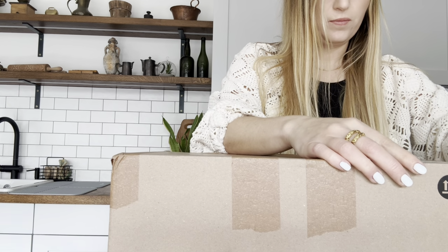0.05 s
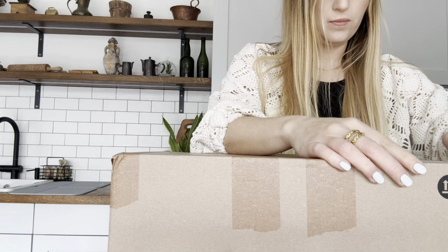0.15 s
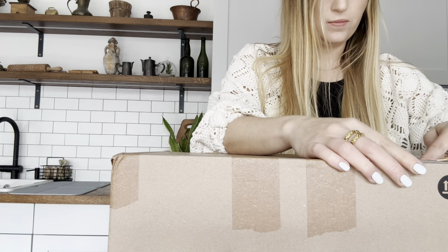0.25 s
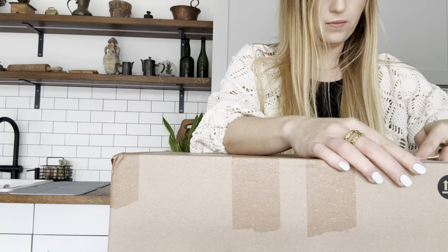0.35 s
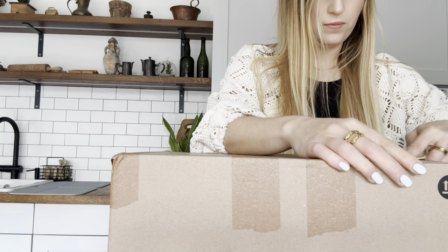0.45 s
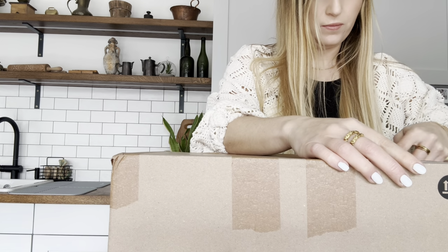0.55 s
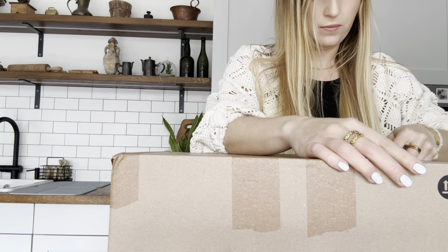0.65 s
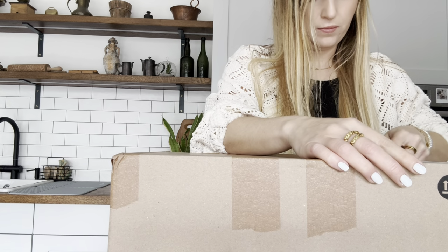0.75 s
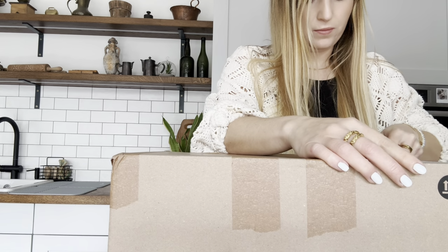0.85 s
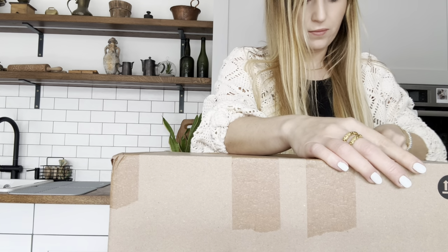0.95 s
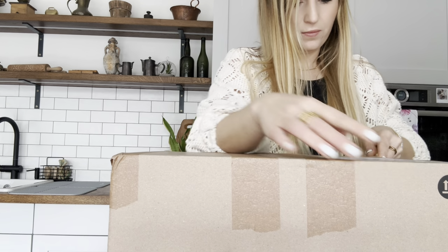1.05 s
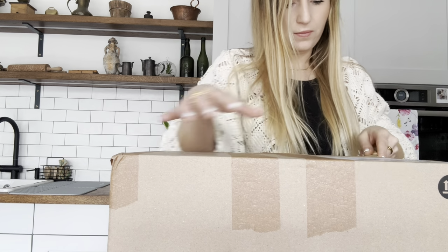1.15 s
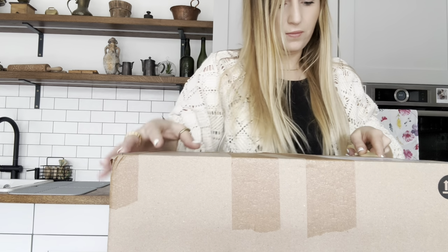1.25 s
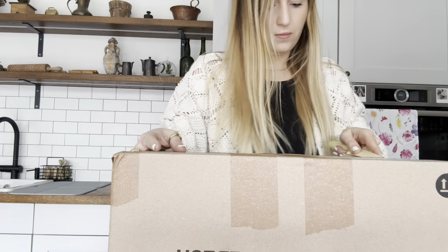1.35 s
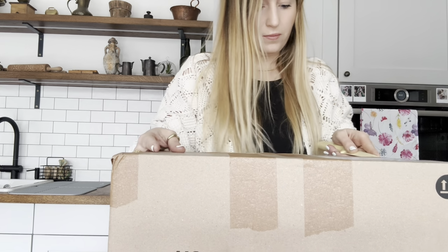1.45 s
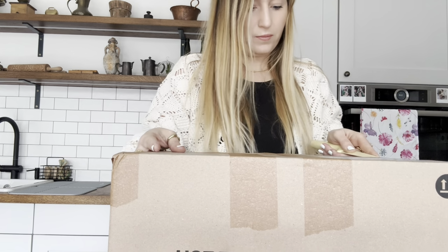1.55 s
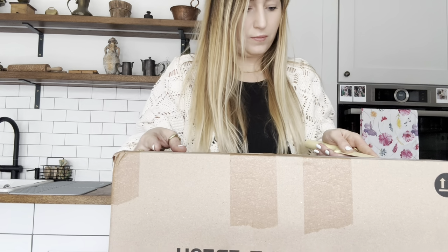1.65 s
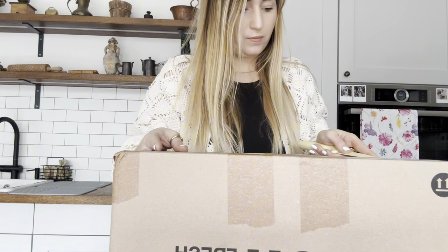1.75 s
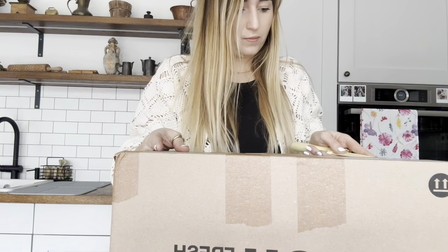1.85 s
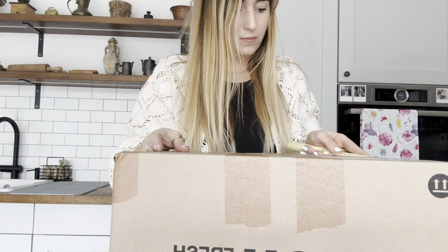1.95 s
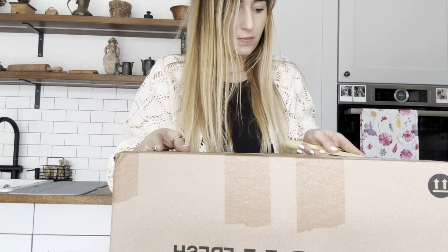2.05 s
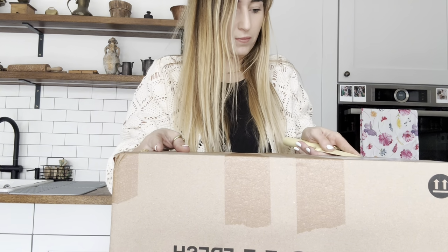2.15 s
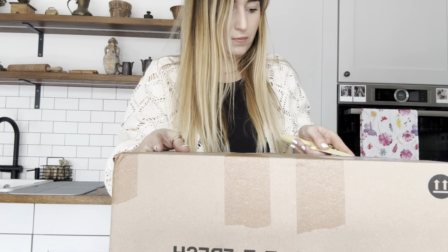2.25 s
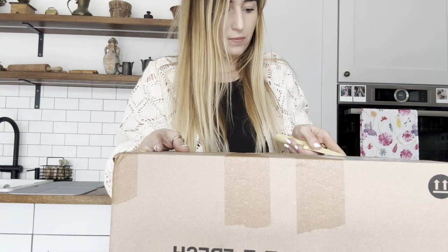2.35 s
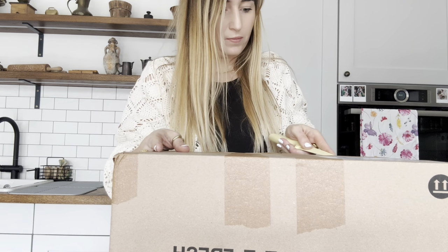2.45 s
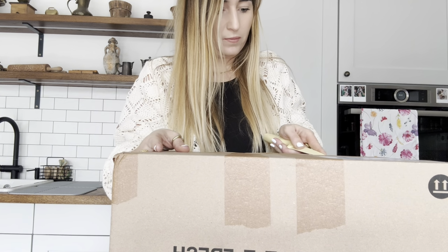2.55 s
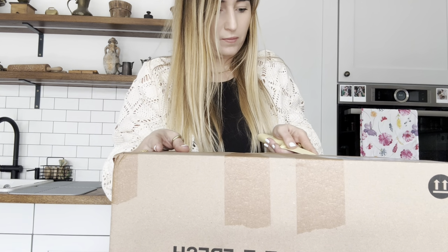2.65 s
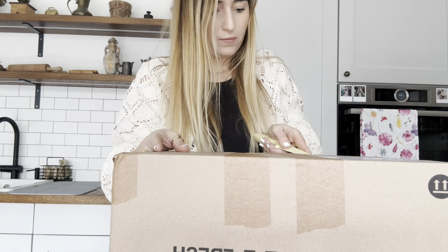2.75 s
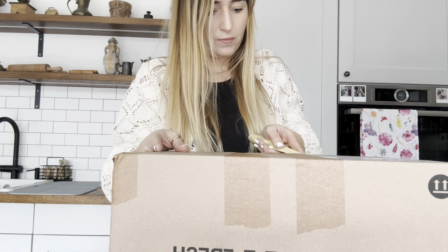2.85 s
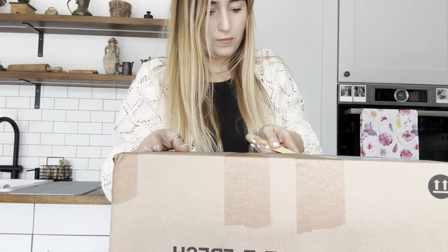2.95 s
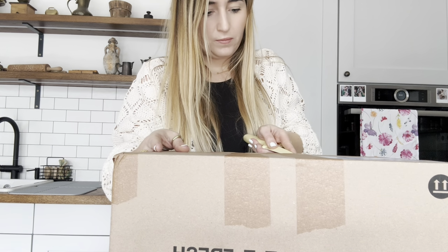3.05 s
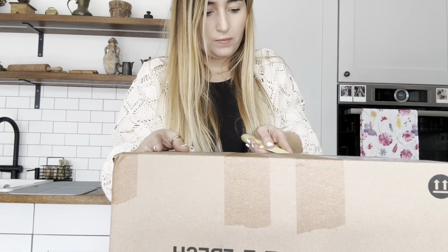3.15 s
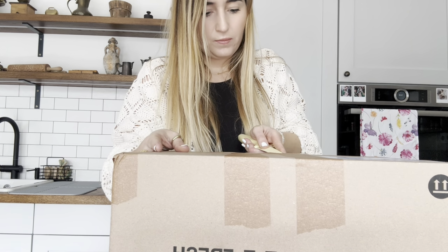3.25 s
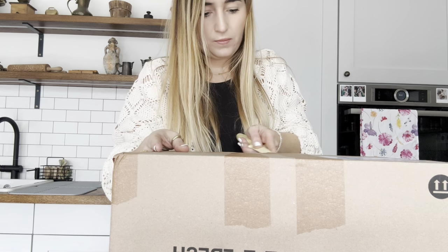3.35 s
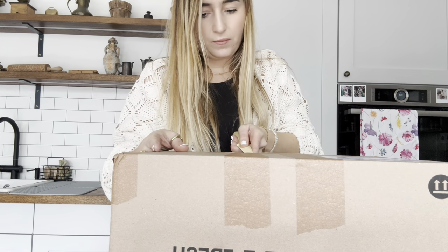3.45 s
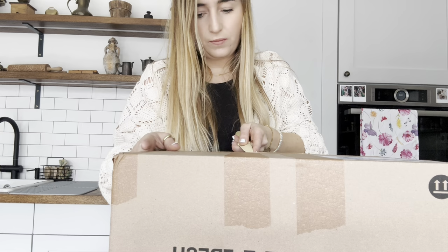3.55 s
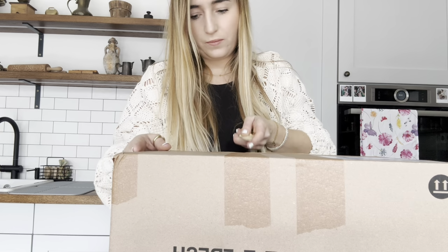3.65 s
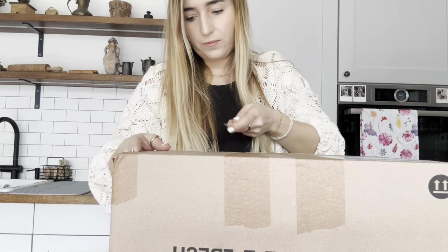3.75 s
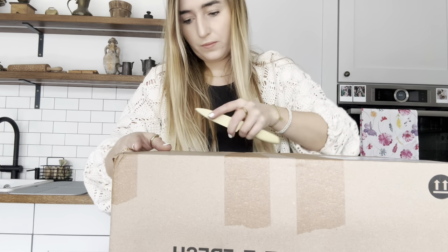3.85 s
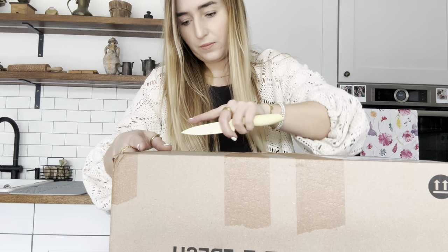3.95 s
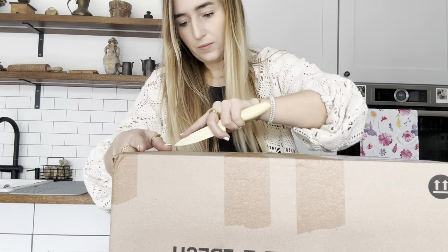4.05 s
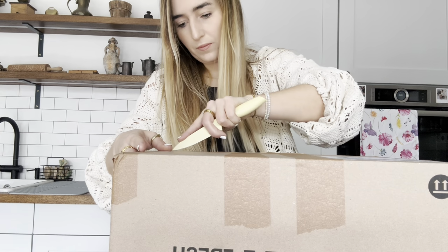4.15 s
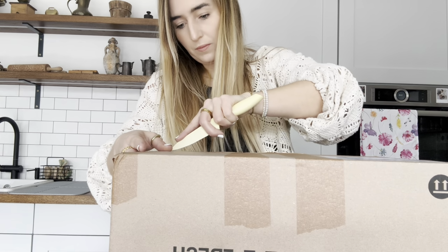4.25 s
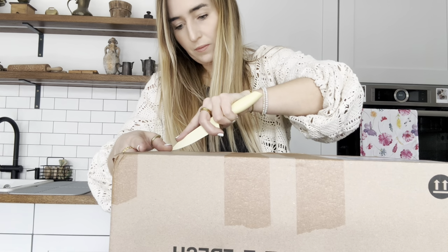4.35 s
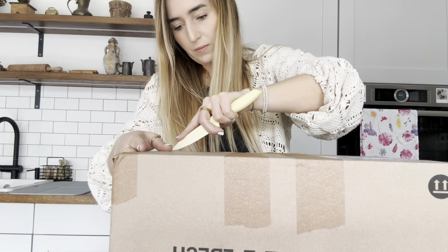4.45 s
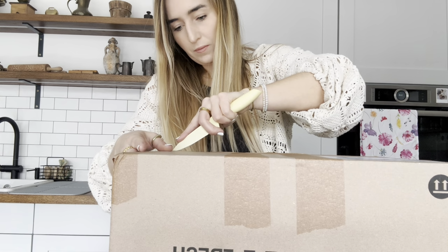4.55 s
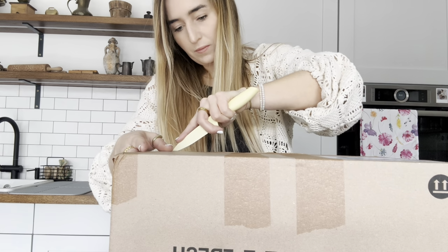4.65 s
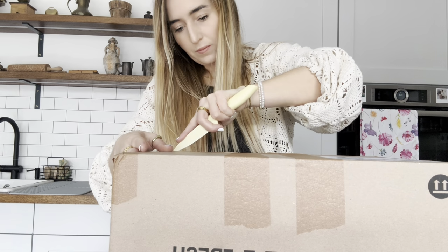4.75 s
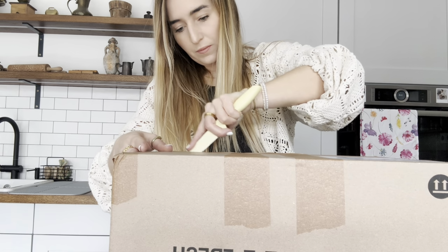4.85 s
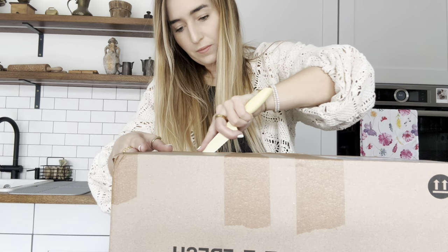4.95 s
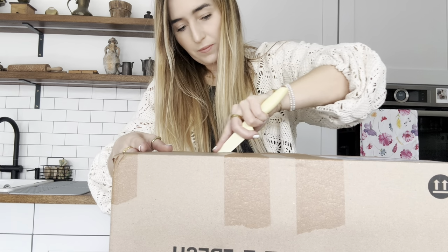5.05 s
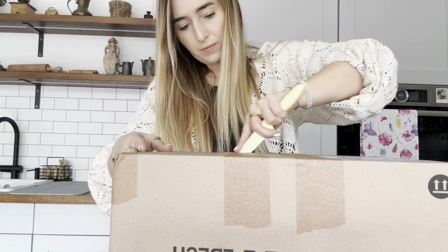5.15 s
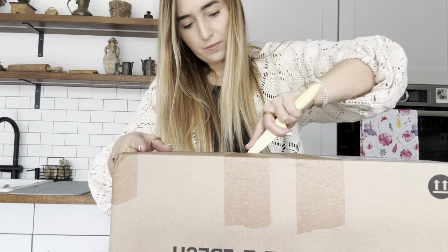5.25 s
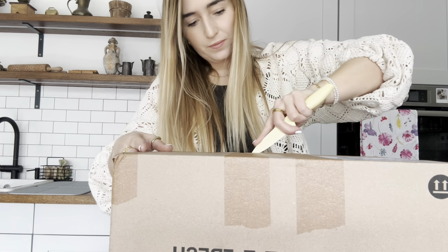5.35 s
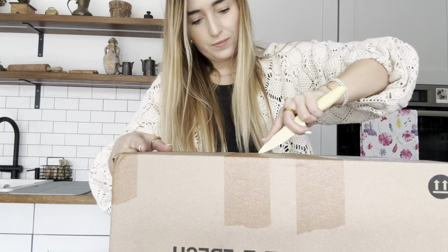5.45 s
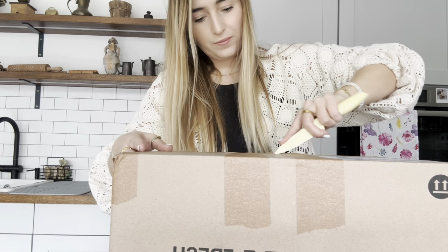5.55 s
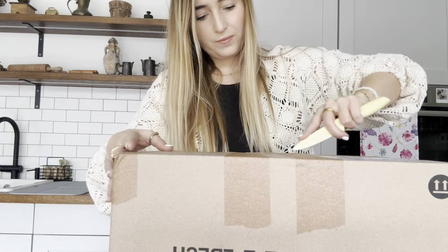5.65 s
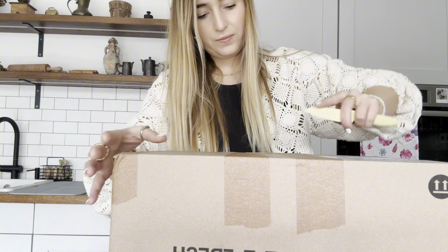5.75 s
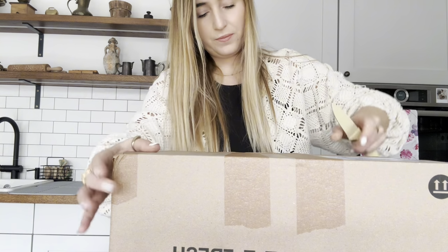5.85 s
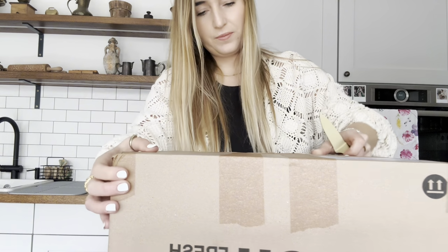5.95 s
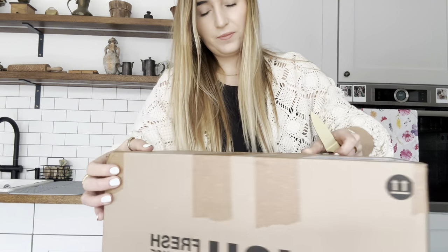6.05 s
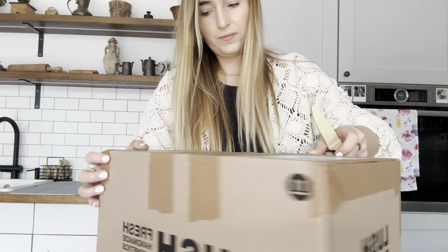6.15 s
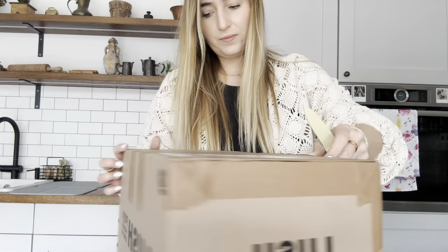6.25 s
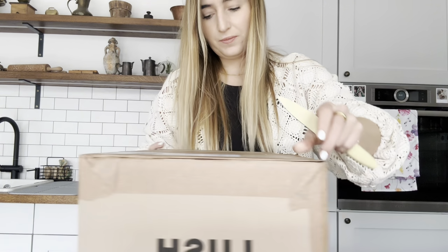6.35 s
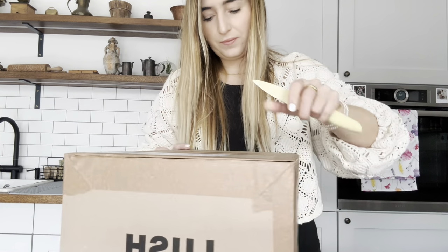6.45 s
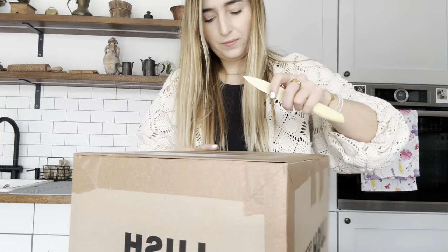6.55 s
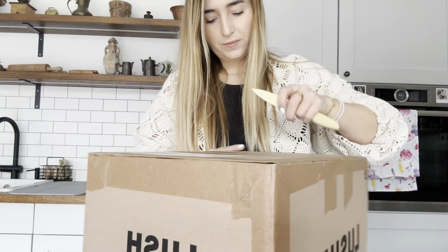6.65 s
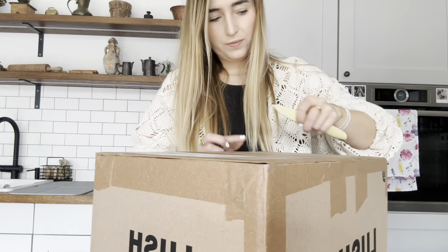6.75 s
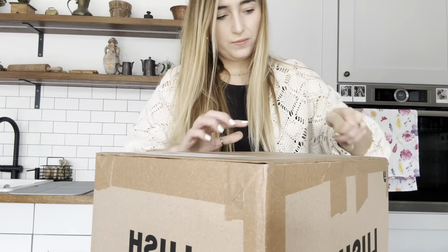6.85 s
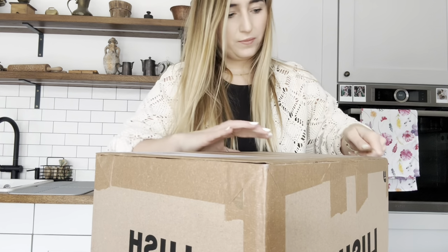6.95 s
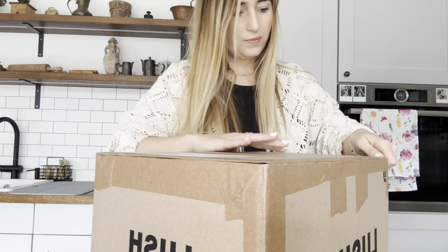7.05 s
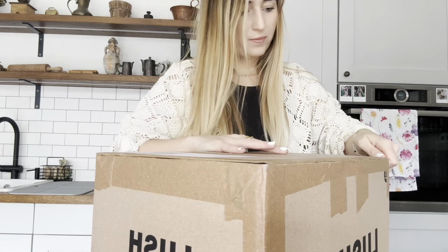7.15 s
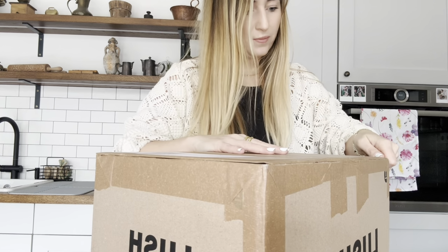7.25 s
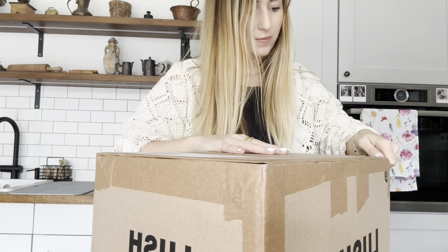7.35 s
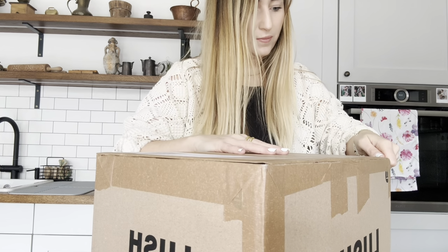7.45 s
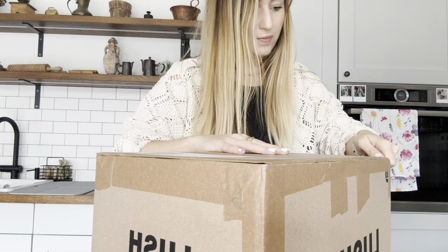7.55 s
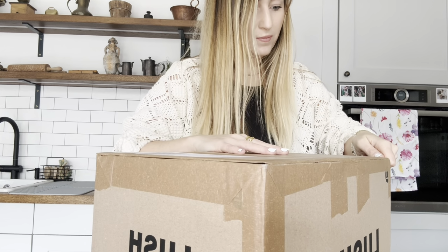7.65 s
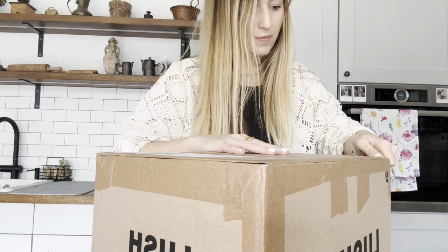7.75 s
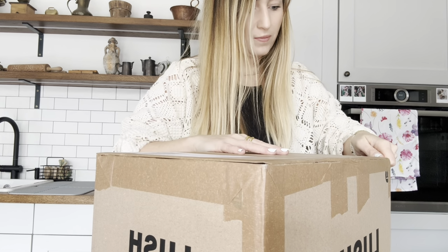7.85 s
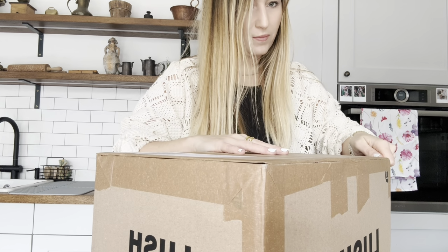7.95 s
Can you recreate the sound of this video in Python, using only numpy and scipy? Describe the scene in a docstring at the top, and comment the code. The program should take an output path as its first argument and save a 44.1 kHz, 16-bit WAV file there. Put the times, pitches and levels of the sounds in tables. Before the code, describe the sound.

Close to a stereo microphone in a quiet kitchen, a blade scrapes and rips tape on a large cardboard box, then hands brush softly over it. Lighter and deeper cuts follow, stuttering and raspy, ending with a tape tear and a knife clack. After a quieter shuffle, another rough cut comes, then knocks, a gritty drag as the box turns, a softer slide and faint pats.

```python
"""Opening a taped box

A knife slits the packing tape of a big cardboard box in a kitchen, close to a stereo microphone.
Blade and hands stick and slip on the board: random tiny slips pass through the box's colours.
The tape snaps in bursts of noise, and the hollow box booms with low swelling tones when pushed.
Then the box is gripped, dragged round on the table and patted, over still air and a faint hum.
"""
import sys
import numpy as np
from scipy import signal
from scipy.fft import rfft, irfft
from scipy.io import wavfile
from scipy.ndimage import uniform_filter1d

SR = 44100
rng = np.random.default_rng(int(sys.argv[2]) if len(sys.argv) > 2 else 0)


def unload_audio(sound):
    """Save the sound as a 16-bit wav file, at the path given as the first command line argument."""
    columns = np.transpose(np.atleast_2d(sound))
    # keep every value between -1 and 1, then stretch to whole-number steps
    steps = np.round(np.clip(columns, -1, 1) * 32767)
    wavfile.write(sys.argv[1], SR, steps.astype(np.int16))


N = 352535  # length in samples

# All levels in the tables are relative: the mixing below scales them further.
# Strokes of blade and hand, one table for each way of rubbing. Each row: start in seconds,
# rise in seconds, hold in seconds, friction level in dB, treble bite in dB,
# change of level over the hold in dB.
SIDE_CUT = [(0.0, 0.0011, 0.022, -27.5, -1.5, -1), (0.04, 0.023, 0.049, -41, -13, 1),
            (0.127, 0.029, 0.023, -29, -1, 1.5), (0.19, 0.065, 0.18, -32, -4.5, 2.5),
            (0.36, 0.13, 0.16, -29, -3.5, -3.5)]
HAND_BRUSH = [(0.8, 0.02, 0.14, -47, -11.5, -2.5), (0.948, 0.027, 0.038, -45, -0.5, -3),
              (1.0, 0.018, 0.086, -41, -25, -0.5), (1.045, 0.016, 0.015, -49, 4.5, -4),
              (1.223, .002, 0.057, -59, 1.5, 18), (1.257, 0.041, 0.053, -36.5, -11, -5),
              (1.34, 0.026, 0.089, -41, -9, -8.5), (1.46, 0.067, 0.13, -62.5, -15, 16.5)]
LIGHT_CUT = [(1.612, 0.037, 0.053, -56.5, -3, 10), (1.715, 0.053, 0.11, -39, -4.5, -3.5),
             (1.88, 0.043, 0.099, -49, -3, 1.5), (2.015, 0.016, 0.032, -40.5, -2, 5.5)]
DEEP_CUT = [(2.155, 0.057, 0.55, -36.5, -4, -3), (2.228, 0.0066, 0.097, -34.5, -14, -0.5),
            (2.35, 0.07, 0.082, -29.5, -12, -2.5), (2.505, 0.0087, 0.02, -30.5, -6, -6.5),
            (2.583, 0.0091, 0.023, -32.5, -14.5, 0.5), (2.655, 0.018, 0.021, -38, -14, 3),
            (2.715, 0.0079, 0.08, -33.5, -6.5, 0.5)]
SHORT_CUTS = [(2.887, 0.023, 0.021, -35.5, -6, 2.5), (2.938, 0.0052, 0.011, -35.5, -2, 1),
              (3.045, 0.026, 0.09, -40, -4, 1.5), (3.16, 0.025, 0.018, -30, -5.5, 0.5),
              (3.21, 0.033, 0.14, -39, -4, -7)]
TAPE_TEAR = [(3.295, 0.036, 0.041, -33.5, -8.5, 4.2), (3.425, 0.021, 0.011, -37, -13, 0.5),
             (3.48, 0.013, 0.19, -52.5, -3, 1)]
FINGER_SHUFFLE = [(4.099, .007, 0.077, -53, -14.5, -1), (4.27, 0.036, 0.032, -62.5, -17, 1),
                  (4.365, 0.031, 0.015, -53.5, -19, 0.5), (4.452, .012, 0.087, -53, -18, -9)]
KNIFE_SET = [(4.55, 0.11, 0.6, -52, -20.5, 2), (5.44, 0.032, 0.034, -38, -27, 0)]
RETURN_CUT = [(4.74, 0.027, 0.011, -49, -3, 14), (4.777, 0.028, 0.045, -26.5, -6.5, 1.5),
              (5.17, 0.017, 0.0053, -27.5, -19, -6.5), (5.21, 0.025, 0.18, -42.5, -1.5, -1.5),
              (5.43, 0.087, 0.02, -41.5, 3.5, -1.5), (5.52, 0.017, 0.039, -42.5, -1, 1),
              (5.66, 0.0025, 0.012, -39.5, -17.5, -13)]
TAPE_SLIT = [(4.94, 0.029, 0.053, -36, 1, 3.4), (5.02, 0.035, 0.097, -29, -3, 1)]
BOX_DRAG = [(5.835, 0.017, 0.055, -40.5, -4, 1.5), (5.91, 0.045, 0.021, -37.5, 1, -2.5),
            (5.95, 0.092, 0.192, -37, 6.5, 3.5), (6.235, 0.03, 0.069, -33.5, 5.5, -3),
            (6.33, 0.015, 0.052, -35.5, 4, -5)]
SLEEVE_SLIDE = [(6.39, 0.051, 0.2, -42, 2, 4), (6.63, 0.029, 0.074, -44.5, 1, -2),
                (6.77, 0.025, 0.037, -49, -18, -4.5)]
PALM_SETTLE = [(6.982, 0.0022, 0.084, -82, 20, 2), (7.045, 0.015, 0.051, -55.5, -9, 9.5),
               (7.13, 0.049, 0.055, -56.5, -11.5, 2), (7.314, 0.019, 0.019, -45, -19, -4),
               (7.7, 0.032, 0.012, -69.5, -14, -2)]
# The ways of rubbing. Each row: its strokes, its colour as pairs of Hz and dB, weight of the treble
# lifts (a plain factor), slips per second, spread of slip sizes in dB, boom in dB,
# release in dB per second, level of the snags in dB, pitch of the snags in Hz.
STROKES = [ (SIDE_CUT, [(40, -13.5), (92, 2.5), (183, -20), (240, -9.5), (423, -12.5), (590, -4.5),
           (744, -15), (2360, -23.5), (2670, -22.5), (3590, -27), (8070, -25), (9820, -28), (12900, -24.5),
           (14200, -43.5)], 0.34, 4000, 2.2, -0.76, 197, -16, 530), (HAND_BRUSH, [(40, -11.5), (86, -10),
           (170, -19), (528, -17.5), (692, -19), (2310, -35), (3170, -32.5), (3680, -35), (9350, -36.5),
           (12000, -33), (14200, -40.5)], 0.47, 5000, 0.92, -0.64, 320, -10, 490), (LIGHT_CUT, [(40, -22),
           (92, 3), (188, -14), (260, -12), (403, -14.5), (528, -6.5), (692, -15), (1280, -15),
           (1720, -13.5), (1950, -18.5), (2360, -30.5), (4160, -30), (5190, -32), (12600, -32),
           (14200, -46)], 0.97, 2700, 2.7, -0.59, 200, -10.5, 504), (DEEP_CUT, [(40, -13), (97, 3),
           (175, -13.5), (315, 1), (403, -9.5), (467, 0.5), (1080, -10.5), (1160, -10), (1720, -14.5),
           (2310, -26), (3100, -29), (10100, -32), (12300, -31), (14200, -44)],
           1, 1300, 1.5, 0, 140, -7.5, 505), (SHORT_CUTS, [(40, -16), (97, -3.5), (348, -14), (444, -3),
           (515, -7.5), (1130, -15), (1720, -12), (2250, -26.5), (3100, -17), (3770, -23), (4370, -20),
           (10300, -21), (12300, -20.5), (14200, -35)], 0.86, 1800, 1.3, -1.02, 280, -11, 560),
           (TAPE_TEAR, [(40, -18.5), (102, -24.5), (162, -25.5), (229, -14), (286, -17.5), (763, -18),
           (1100, -31.5), (1720, -27), (4820, -30), (12600, -32), (14200, -47)],
           0.22, 2500, 0.93, 7.7, 137, -8, 810), (FINGER_SHUFFLE, [(40, -20), (107, -7.5), (175, -31.5),
           (246, -25), (642, -24.5), (1160, -39), (1310, -47), (12300, -38), (14200, -59)],
           .2, 4200, 1.4, -9.5, 690, -17, 484), (KNIFE_SET, [(40, 2.5), (76, -12), (151, -5), (190, -10),
           (515, -3.5), (582, -8), (952, -12), (2950, -35), (14200, -39)], .1, 5900, 2, 3, 200, -15.5, 710),
           (RETURN_CUT, [(40, -14), (86, -1), (185, -18), (290, -6.5), (374, -7), (434, -1), (520, -2),
           (658, -1.5), (1020, -11.5), (1720, -15), (2420, -17), (9580, -22.5), (12000, -19.5),
           (14200, -28)], 0.41, 1600, 0.54, 0, 130, -13.5, 440), (TAPE_SLIT, [(40, -27), (95, -6),
           (175, -12.5), (280, -5), (450, -1.5), (660, -0.5), (1010, -10.5), (1200, -7), (2200, -11),
           (2700, -14.5), (6800, -20), (10000, -20.5), (12000, -15.5), (14200, -28.5)],
           0.3, 1200, 2.4, 0, 180, -11.5, 600), (BOX_DRAG, [(40, -11), (80, -5), (188, -7.5), (315, -2.5),
           (413, -3.5), (612, -4), (821, -3), (1800, -6.5), (2140, -13), (3770, -22), (9820, -22.5),
           (12300, -17), (14200, -29.5)], .2, 8000, 1.7, -1, 410, -13.5, 490), (SLEEVE_SLIDE, [(40, -6),
           (92, 8.5), (183, -4), (240, 1), (906, 2.5), (1000, -1.5), (1410, 0.5), (5720, -20.5),
           (10100, -20), (12300, -15.5), (14200, -30.5)], 0.103, 5900, 0.71, -1.2, 270, -16.5, 350),
           (PALM_SETTLE, [(40, -0.5), (97, 0.5), (188, -20), (253, -17.5), (413, -19.5), (1280, -34.5),
           (9820, -41), (12300, -40.5), (14200, -52)], 0.072, 3300, 2.5, -11, 340, -25, 290)]
# Resonances of the box panels that colour the rubbing. Each row: pitch in Hz, width in Hz, lift in dB.
PANELS = [(101, 254, 6), (189, 21, -4.5), (238, 49, 4.5), (323, 51, 4.5), (373, 33, -0.5), (485, 144, 2),
          (520, 77, 1.5), (634, 36, 2), (980, 280, 1)]
# Treble lifts of the rubbing, strongest in the light, deep and short cuts.
# Each row: pitch in Hz, width in Hz, lift in dB before the weight.
TREBLE_LIFTS = [(1703, 250, 5), (2170, 1600, 4), (3127, 530, 7), (4250, 480, 8), (5230, 1100, -1.5),
                (6400, 620, 3), (12150, 640, 3.5)]
# Low and high roll-off applied to the rubbing. Each row: frequency in Hz, gain in dB.
RUB_ROLLOFF = [(24, -26), (40, -2), (12800, -2.5), (13900, 5), (14900, -24.5)]
# The lid is pushed in and the air in the box booms. Each row: time in seconds, level in dB, pitch in Hz.
BOOMS = [(0.019, -17, 88.6), (0.068, -18.5, 96.5), (0.151, -17, 83.5), (0.449, -18, 78), (0.555, -17, 89.2),
         (0.803, -20, 95.2), (1.07, -25, 89.3), (1.287, -19.5, 80), (1.623, -32.5, 93),
         (1.703, -24.5, 93.4), (2.056, -30, 92), (2.411, -23, 100.2), (2.628, -24.5, 94),
         (2.821, -25.5, 94), (2.923, -29.5, 92), (3.348, -16, 96.4), (3.369, -15.5, 104.6),
         (3.478, -30, 99), (3.621, -16.5, 89.6), (4.116, -36, 81), (4.167, -33, 106), (4.313, -35.5, 106),
         (4.408, -33.5, 107.6), (4.467, -36, 86), (4.518, -37.5, 76), (5.197, -22.5, 80),
         (5.536, -13.5, 90), (5.664, -29.5, 93), (5.845, -16, 83.3), (5.9, -19, 77), (5.979, -29, 84.6),
         (6.054, -30.5, 86.8), (6.397, -28.5, 130), (6.552, -38, 134.2), (6.617, -34.5, 96),
         (7.101, -28, 95.2), (7.32, -35, 100)]
# Knife and fingers knock on the board. Each row: start in seconds, peak in dB,
# length of contact in seconds, pitch of the crunch in Hz.
KNOCKS = [(0.072, -20.5, 0.0055, 600), (0.127, -22.5, 0.0061, 560), (0.7989, -23.5, 0.0043, 500),
          (0.953, -33, 0.005, 520), (1.259, -34, 0.0087, 600), (2.022, -28.5, 0.0059, 653),
          (2.896, -25, 0.0047, 680), (3.62, -33, 0.0044, 260), (4.103, -40.5, 0.0072, 680),
          (4.515, -43, 0.003, 700), (4.528, -39.5, 0.0047, 480), (4.848, -20, 0.0053, 526),
          (5.516, -17.5, 0.0007, 435), (5.537, -21.5, 0.019, 222), (5.661, -30.5, 0.0038, 600),
          (5.84, -23.5, 0.0072, 246), (5.852, -17.5, 0.0054, 625), (5.8696, -8, 0.0025, 450),
          (5.897, -26, 0.0077, 300), (6.234, -23, 0.0071, 220), (7.054, -52, 0.0042, 400),
          (7.318, -41, 0.0045, 410), (7.715, -51, 0.0016, 700), (7.737, -48.5, 0.0023, 900)]
# The box ringing under a knock. Each row: pitch in Hz, level in dB, time to fall 60 dB in seconds.
BOARD = [(235.6, 3.5, 0.086), (296, -0.5, 0.085), (419.5, 4, 0.06), (471, 5, 0.037), (531, 3, 0.059),
         (621, 3.5, 0.039), (766, -16, 0.079), (1326, 6, 0.019), (1770, -4, .025)]
# Tape snaps and rips, ticks of blade and nails. Each row: start in seconds, level in dB,
# swell time in seconds, extra fizz above 7 kHz in dB.
SNAPS = [(0.0127, -22, 0.00021, -4.5), (0.0138, -24, 0.0041, 1), (0.072, -29, 0.0024, -6),
         (0.1383, -27.5, 0.014, -6.5), (0.7968, -39, 0.0012, -4), (1.056, -45, 0.0097, 0),
         (2.897, -39.5, 0.0012, -15), (3.237, -26, 0.00046, 0.5), (3.319, -30, 0.01, -0.5),
         (3.3356, -29.5, 0.01, -4.5), (4.161, -62.5, 0.011, -4), (4.464, -61.5, 0.0036, 1),
         (5.5189, -26, 0.0039, -0.5), (5.522, -27.5, 0.0013, -9.5), (5.527, -37.5, 0.0025, -15.5),
         (5.661, -55, 0.0081, 18), (5.772, -57, 0.0031, 12), (5.793, -40.5, 0.00073, 2),
         (5.832, -38.5, 0.0012, 4), (5.851, -25, 0.00038, 3), (5.8605, -39.5, 0.00033, 2),
         (5.8696, -27, 0.0013, 0), (6.987, -65, 0.0016, -2), (7.302, -49, 0.00061, 6),
         (7.318, -48.5, 0.00074, 3), (7.714, -71, 0.0013, 5), (7.737, -73, .0015, 5)]
# Colour of a snap. Each row: frequency in Hz, gain in dB.
SNAP_COLOUR = [(500, 0), (1500, -0.5), (2300, -5), (3100, 1), (4200, -4), (8000, -5), (10000, -3),
               (12500, 0), (14200, -5), (15000, -19.5)]
# Blade or box catches and judders. Each row: start in seconds, length in seconds, peak in dB,
# slips per second.
JUDDERS = [(0.004, 0.021, -19.5, 484), (2.236, 0.04, -24.5, 487), (2.415, 0.04, -27, 490),
           (2.513, 0.027, -23.5, 460), (2.592, 0.033, -23.5, 470), (2.613, 0.015, -23, 460),
           (2.717, 0.014, -27, 470), (2.908, 0.024, -24.5, 450), (2.952, 0.026, -28, 440),
           (3.173, 0.032, -26.5, 440), (4.78, 0.037, -17.5, 430), (4.85, 0.025, -27, 650),
           (5.065, 0.026, -28, 530), (5.124, 0.06, -33, 600), (6.233, 0.11, -27.5, 320)]
# Tape and board rasp as they part. Each row: start in seconds, length in seconds, level in dB, pitch in Hz.
RASPS = [(0.409, 0.25, -42.5, 2790), (1.74, 0.07, -50, 1840), (1.808, 0.098, -51, 1650),
         (2.231, 0.056, -46.5, 1970), (2.749, 0.11, -44, 1760), (2.893, 0.019, -39, 1700),
         (3.167, 0.021, -46, 1650), (4.82, 0.029, -40.5, 1680), (4.846, 0.016, -35, 1770),
         (4.986, 0.013, -32.5, 3150), (5.002, 0.02, -40, 4970), (5.046, 0.016, -35, 2820),
         (5.084, 0.066, -39, 1980), (5.16, 0.014, -39, 2200), (6.26, 0.048, -43, 1750)]
# The knife clacks on the lid. Each row: start in seconds, peak in dB, level of the tick in dB,
# extra fizz above 7 kHz in dB.
CLACKS = [(3.613, -14.5, -22.5, -16.5), (5.495, -25, -20, -8)]
# The knife's ringing modes. Each row: pitch in Hz, level in dB, time to fall 60 dB in seconds.
KNIFE = [(267, -4.5, 0.056), (414, -5, 0.021), (550, 0.5, 0.019), (660, 11, 0.0087), (794, -16.5, 0.19),
         (893, -18, 0.07), (930, -1.5, 0.015), (1360, -13, 0.015), (2800, -5, 0.0078), (3150, 2.5, 0.0075)]
# How long the kitchen echoes last. Each row: frequency in Hz, time to fall 60 dB in seconds.
KITCHEN = [(100, 0.55), (260, 0.61), (700, 0.53), (1840, 0.55), (4850, 0.73), (13000, 0.41)]
# Colour of the still room air. Each row: frequency in Hz, gain in dB.
ROOM_AIR = [(15, -22.5), (25, -20), (33, -6.5), (54, 5), (71, -22), (101, -8), (172, -8.5), (309, -19.5),
            (344, -4), (394, -20.5), (9020, -46.5), (13800, -41.5), (15000, -63.5)]
# Hum of a kitchen appliance. Each row: pitch in Hz, level in dB.
HUM = [(48.4, -64), (96.9, -58), (236.9, -80.5), (344.5, -73)]
# Gain of the side signal: nearly mono from 8 to 12 kHz. Each row: frequency in Hz, gain in dB.
SIDE_GAIN = [(60, -14.5), (130, -10), (260, -10), (600, -3), (1400, -5.5), (2400, -1), (4000, 1),
             (7200, 1.5), (8400, -25.5), (11000, -15.5), (12200, -17.5), (13500, 8), (14200, 3),
             (14800, 14)]
# Treble resonances of the microphone. Each row: pitch in Hz, width in Hz, lift in dB.
MICROPHONE = [(8000, 1300, 3), (10400, 1100, -0.5), (12570, 3100, 6.5)]

HZ = np.fft.rfftfreq(4096, 1 / SR)  # frequency grid for the colours
STROKE_T = np.arange(round(1.2 * SR)) / SR  # clock of one stroke in seconds


def rub(stroke, colour, treble_weight, slips_per_s, spread_db, boom_db, release_db_per_s, snag_db, snag_hz):
    """Tiny slips, bunched where the fibres catch, shake the panels. Gives mid and side."""
    start_s, rise_s, hold_s, force_db, bite_db, lean_db = stroke
    t = STROKE_T
    size = gain_of(spread_db * np.minimum(rng.exponential(1, len(t)), 5))
    slips = size * (rng.random(len(t)) < slips_per_s / SR) * rng.choice([-1, 1], (2, len(t)))
    drive = evened(slips) + 0.81 * rng.standard_normal(slips.shape)  # slips plus hiss
    snags_per_s = 120
    kicks = (rng.random(len(t)) < snags_per_s / SR) * rng.uniform(0.37, 1, len(t))
    drive = patchy(drive) * stutter(kicks, snag_db)

    tone_db = read(colour, HZ) + read(RUB_ROLLOFF, HZ)
    tone_db = tone_db + lifts(PANELS) + treble_weight * lifts(TREBLE_LIFTS)
    tone_db = tone_db + boom_db / (1 + (HZ / 160) ** 4)
    sound = coloured(drive, tone_db)

    # The board growls with the force; the edge hisses with how hard it bites.
    split = signal.butter(3, 2500, fs=SR, output="sos")
    body = signal.sosfiltfilt(split, sound)
    edge = 0.55 * evened(sound - body) * gain_of(bite_db)
    body = body / band(body, 170, 2500).std() + gain_of(snag_db) * snags(kicks, snag_hz)
    body = body / np.hypot(1, gain_of(snag_db))
    body = body * gain_of(wander(len(t), per_s=45))  # the growl drifts by about 1 dB
    level_db = force_db + pressure(rise_s, hold_s, lean_db, release_db_per_s)
    fade_in = np.minimum(t / 0.00052, 1)
    return start_s, (body + edge) * gain_of(level_db) * fade_in


def pressure(rise_s, hold_s, lean_db, release_db_per_s):
    """Level of one stroke in dB: it builds, holds while the hand leans in or eases off, then lets go."""
    swell_db = 13
    building = np.maximum(1 - STROKE_T / rise_s, 0)
    holding = np.clip((STROKE_T - rise_s) / hold_s, 0, 1)
    released_s = np.maximum(STROKE_T - rise_s - hold_s, 0)
    return -swell_db * building ** 2 + lean_db * holding - release_db_per_s * released_s


def patchy(x, patch_db=2.5, sweep_db=1.18):
    """The colour shifts in small patches and broad sweeps as the contact moves over the board."""
    z = signal.stft(x, nperseg=1024)[2]
    chance = uniform_filter1d(rng.standard_normal(z.shape[1:]), size=6, axis=1)
    patches = evened(uniform_filter1d(chance, size=3, axis=0))
    sweeps = evened(uniform_filter1d(chance[::-1], size=25, axis=0))
    shifted = z * gain_of(patch_db * patches + sweep_db * sweeps)
    return signal.istft(shifted, nperseg=1024)[1][:, :x.shape[1]]


def stutter(kicks, snag_db, depth=1.6, burst_s=0.0014):
    """Each snag lets go a short burst of slips, so a blade that catches hard stutters."""
    bursts = signal.lfilter([1], [1, -np.exp(-1 / (burst_s * SR))], kicks)
    return evened(1 + depth * gain_of(snag_db) * bursts)


def snags(kicks, hz, width_hz=170):
    """Each snag of the edge on the flutes rings the lid at a pitch that shifts with the place."""
    pitch = hz * (1 + 0.092 * wander(len(kicks), per_s=14))
    pushes = kicks * rng.choice([-1, 1], (2, len(kicks)))
    return evened(resonate(resonate(pushes, pitch, width_hz), pitch, width_hz))


def boom(s, db, hz):
    """The lid swells and dies at its own pitch and leaves the air in the box ringing."""
    t = np.arange(SR // 3) / SR
    swell_s, cavity_hz, cavity_decay_s = 0.013, 96, 0.027
    swell = t / swell_s * np.exp(1 - t / swell_s)
    lid = swell ** 2.33 * np.exp(2j * np.pi * hz * t)
    cavity = 0.028 * (1 - np.exp(-t / swell_s))
    cavity = cavity * np.exp(-t / cavity_decay_s + 2j * np.pi * cavity_hz * t)
    wave = gain_of(db - 1) * (lid + cavity)
    # the swell sets in just before the listed time; the side is a quarter turn off the mid
    return s - 0.0024, np.array([wave.imag, .6 * wave.real])


def knock(s, db, contact_s, hz):
    """A blow rings the board's modes while the flutes crunch under it, cut off above the crunch pitch."""
    t = np.arange(SR // 3) / SR
    ring = ringing(BOARD, t)
    puff = band(rng.standard_normal((2, len(t))), 0.08 * hz, 2 * hz, order=1)
    crunch = 0.69 * evened(puff) * np.exp(-t / contact_s)
    hit = (0.19 * ring + crunch) * (1 - np.exp(-t / 0.0013))  # soft onset
    hit = band(hit, 120, 2.07 * hz, order=3)
    return s, gain_of(db) * hit / abs(hit).max(1, keepdims=True)


def snap(s, db, swell_s, fizz_db, debris_per_s=700, debris_s=0.0082):
    """Breaking film bursts brightly, a crack when short, a rip when longer; torn fibres crackle after."""
    t = np.arange(SR // 8) / SR
    tone_db = read(SNAP_COLOUR, HZ) + fizz_db * (1 - 1 / (1 + (HZ / 7000) ** 6))
    hiss = coloured(rng.standard_normal((2, len(t))), tone_db)
    specks = rng.standard_normal((2, len(t))) * (rng.random(len(t)) < debris_per_s / SR)
    debris = coloured(evened(specks), tone_db)
    burst = hiss * t / swell_s * np.exp(1 - t / swell_s)
    burst = burst + gain_of(-17) * debris * np.exp(-t / debris_s)
    return s, gain_of(db - 7) * burst / band(hiss, 2000, 7700).std()


def judder(s, length_s, db, hz):
    """Nearly regular stick and slip, a sawtooth with wavering speed: a brief pitched grunt."""
    t = np.arange(SR // 8) / SR
    slip_rate = hz * (1 + 0.036 * wander(len(t), per_s=200))
    turns = np.cumsum(slip_rate) / SR + 0.18 * rng.random((2, 1))
    swell = np.sin(np.pi * np.minimum(t / length_s, 1))
    grunt = band(turns % 1 - .5, 300, 900, order=1) * swell
    return s, gain_of(db) * grunt / abs(grunt).max()


def rasp(s, length_s, db, hz, fibres_per_s=900, spread_db=3):
    """Fibres part in a coarse burst and ring the strip under the blade at a wavering pitch."""
    t = np.arange(SR // 3) / SR
    size = gain_of(spread_db * np.minimum(rng.exponential(1, len(t)), 4))
    fibres = size * (rng.random(len(t)) < fibres_per_s / SR) * rng.choice([-1, 1], (2, len(t)))
    pitch = hz * (1 + 0.013 * wander(len(t), per_s=60))
    width_hz = 0.24 * hz
    strip = resonate(resonate(fibres, pitch, width_hz), pitch, width_hz)
    swell = np.sin(np.pi * np.minimum(t / length_s, 1))
    return s, gain_of(db) * evened(strip) * np.sqrt(np.maximum(swell, 0))


def clack(s, db, tick_db, fizz_db):
    """The knife strikes the lid: a bright tick, a hard clack, then a faint ring of the blade."""
    t = np.arange(SR // 2) / SR
    ring = ringing(KNIFE, t) * (1 - np.exp(-t / 0.0017))  # soft onset
    hit = gain_of(db) * ring / abs(ring).max(1, keepdims=True)
    add(hit, *snap(0, tick_db, 0.00045, fizz_db))
    return s, hit


def moving_kitchen(x, turns_per_s=3.3, count=4):
    """The contact travels over the box, so one pattern of echoes keeps giving way to another."""
    turns = turns_per_s * np.arange(N) / SR
    echoes = 0
    for k in range(count):
        share = np.maximum(np.cos(2 * np.pi * (turns - k / count)), 0)
        echoes = echoes + kitchen(x * share)
    return echoes


def kitchen(x, wet_db=-9, gap_s=0.006, near_db=-6, near_s=0.005):
    """The lid and nearby cupboards scatter the treble at once; then each band dies at its own speed."""
    time = np.arange(SR) / SR
    taps = rng.choice([-1., 1.], (2, SR)) * (rng.random((2, SR)) < 3000 / SR)
    near = taps * np.exp(-time / near_s) * (time > .001)
    near = band(near / np.linalg.norm(near, axis=1, keepdims=True), 3500, 17000)
    hz, t, z = signal.stft(taps[::-1] * (time > gap_s), SR, nperseg=256)
    fading = gain_of(-60 * t / read(KITCHEN, hz)[:, None])
    tail = signal.istft(z * fading, SR, nperseg=256)[1][:, :SR]
    echoes = gain_of(near_db) * near + gain_of(wet_db) * tail / np.linalg.norm(tail[0])
    return signal.fftconvolve(x, echoes, axes=1)[:, :N]


def background():
    """Still room air, as coloured noise, and a faint wavering hum of sine tones."""
    t = np.arange(N) / SR
    air = evened(coloured(rng.standard_normal((2, N)), read(ROOM_AIR, HZ)))
    hum = 0
    for hz, db in HUM:
        tone = np.sqrt(2) * np.sin(2 * np.pi * (hz * t + rng.random((2, 1))))
        hum = hum + gain_of(db) * tone * (1 + 0.2 * wander(N, per_s=4.4))
    return gain_of(-59.5) * air + gain_of(-9) * hum


def gain_of(db):
    """Decibels to amplitude."""
    return 10 ** (np.asarray(db) / 20)


def evened(x):
    """Scales to an rms (average strength) of 1."""
    return x / np.sqrt(np.mean(x ** 2) + 1e-20)


def read(points, hz):
    """Reads a curve between its points on a log-frequency axis."""
    f, value = np.transpose(points)
    return np.interp(np.log(hz + 1), np.log(f + 1), value)


def add(mix, s, sound):
    """Adds a sound to the mix at time s in seconds."""
    part = mix[..., max(round(s * SR), 0):][..., :sound.shape[-1]]
    part += sound[..., :part.shape[-1]]


def band(x, lo_hz, hi_hz, order=2):
    """Keeps only the band between two frequencies."""
    sos = signal.butter(order, [lo_hz, min(hi_hz, .49 * SR)], "band", fs=SR, output="sos")
    return signal.sosfilt(sos, x)


def coloured(x, db):
    """Filters with the gain db on the grid HZ, with no sound ahead of its cause (minimum phase)."""
    both_halves_db = np.r_[db, db[-2:0:-1]]
    log_gain = np.log(gain_of(np.maximum(both_halves_db, -100)))
    taps = irfft(np.exp(np.conj(signal.hilbert(log_gain)))[:len(HZ)])
    return signal.fftconvolve(x, taps[None], axes=1)[:, :x.shape[1]]


def lifts(resonances):
    """Bell-shaped resonances as dB on the grid HZ."""
    return sum(db / (1 + ((HZ - hz) / (width / 2)) ** 2) for hz, width, db in resonances)


def ringing(modes, t):
    """Sum of sine tones that each die away at their own speed."""
    total = 0
    for hz, db, t60 in modes:
        tone = np.sin(2 * np.pi * (hz * t + rng.random((2, 1))))
        total = total + gain_of(db - 60 * t / t60) * tone
    return total


def resonate(x, hz, width_hz):
    """A resonance that follows the pitch curve hz."""
    turn = np.exp(2j * np.pi * np.cumsum(hz) / SR)
    r = np.exp(-np.pi * width_hz / SR)
    return 2 * (turn * signal.lfilter([1 - r], [1, -r], x / turn + 1e-18)).real


def wander(count, per_s):
    """A smooth random curve of rms 1, with per_s fresh random points a second."""
    knots = np.arange(count) * per_s / SR
    return evened(np.interp(knots, np.arange(4000), rng.standard_normal(4000)))


def scene():
    """Everything on the box sounds in the kitchen; mid and side become left and right."""
    box, knife = np.zeros((2, 2, N))
    for strokes, *surface in STROKES:
        for stroke in strokes:
            add(box, *rub(stroke, *surface))
    sources = (boom, BOOMS), (knock, KNOCKS), (snap, SNAPS), (judder, JUDDERS), (rasp, RASPS)
    for source, table in sources:
        for row in table:
            add(box, *source(*row))
    for row in CLACKS:
        add(knife, *clack(*row))
    # the clacks come from the near edge of the lid: their treble stays dry
    echoes = moving_kitchen(box + band(knife, 100, 1400))
    mid, side = box + knife + echoes + background()
    side = irfft(rfft(side) * gain_of(read(SIDE_GAIN, np.fft.rfftfreq(N, 1 / SR))), N)
    return np.array([mid + side, mid - side]) * gain_of([[.4], [-.4]])  # left slightly louder


def record(dry):
    """The microphone's treble resonances, the low cut at 32 Hz and the upper limit at 15.5 kHz."""
    dry = coloured(dry, lifts(MICROPHONE))
    dry = signal.sosfilt(signal.butter(3, 32, "high", fs=SR, output="sos"), dry)
    upper_limit = signal.firwin(255, 15500, window=("kaiser", 9), fs=SR)
    return signal.oaconvolve(dry, upper_limit[None], "same")


dry = scene()
out = record(dry)
unload_audio(out)
```